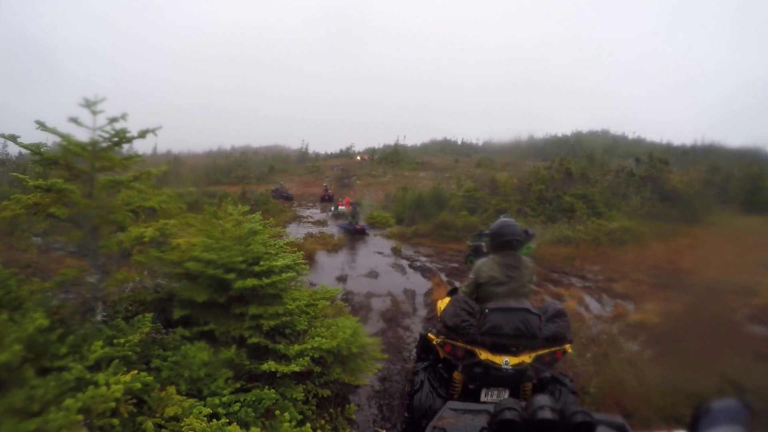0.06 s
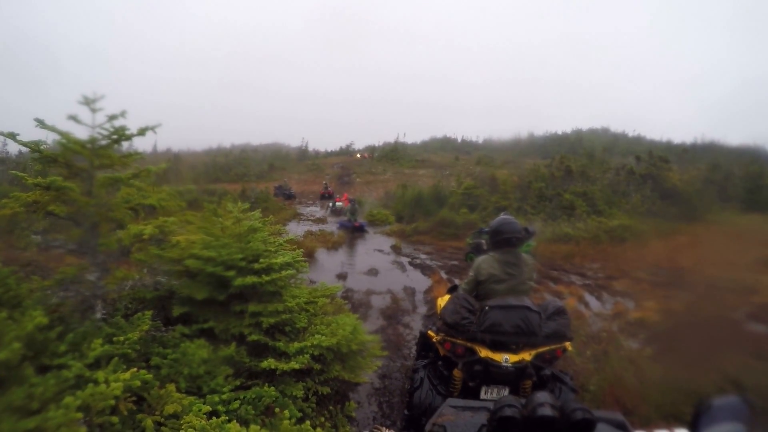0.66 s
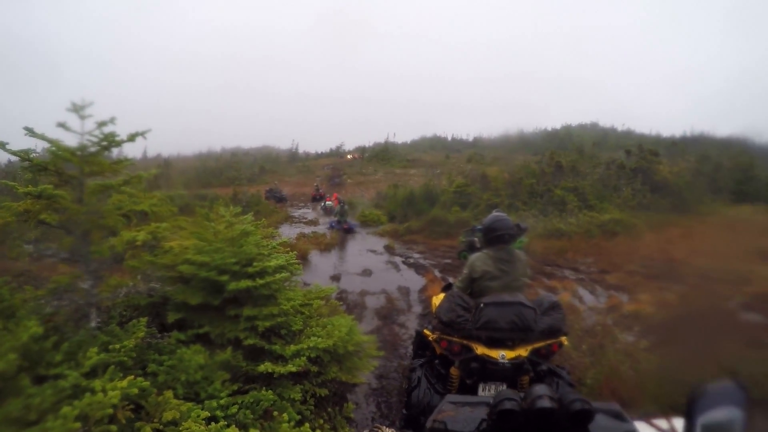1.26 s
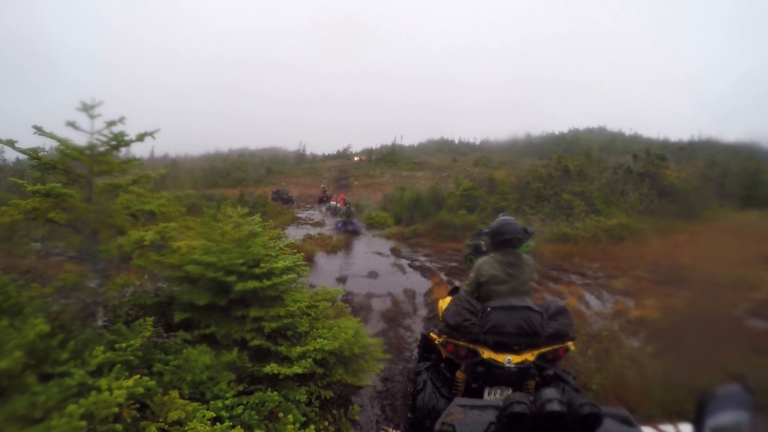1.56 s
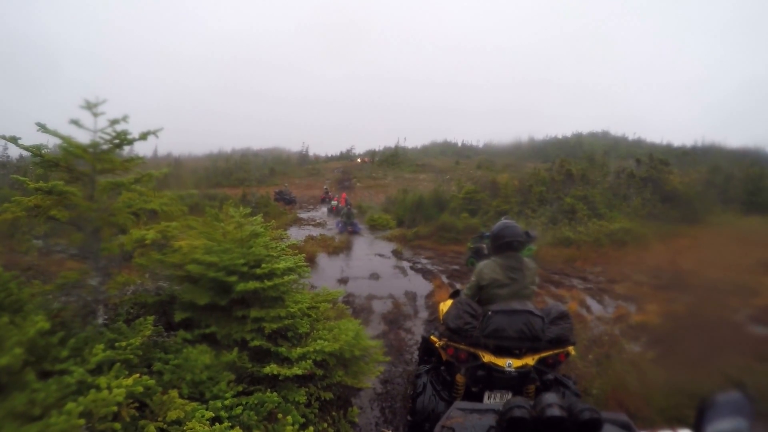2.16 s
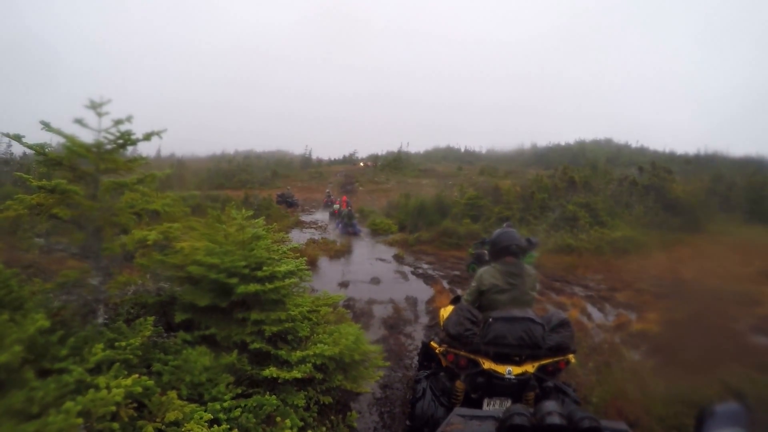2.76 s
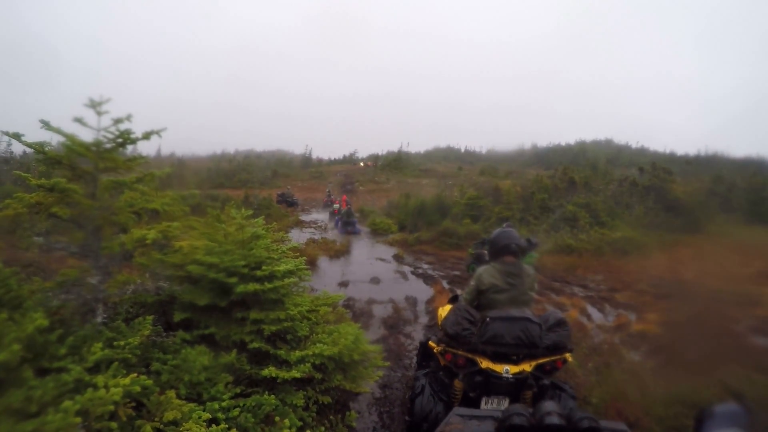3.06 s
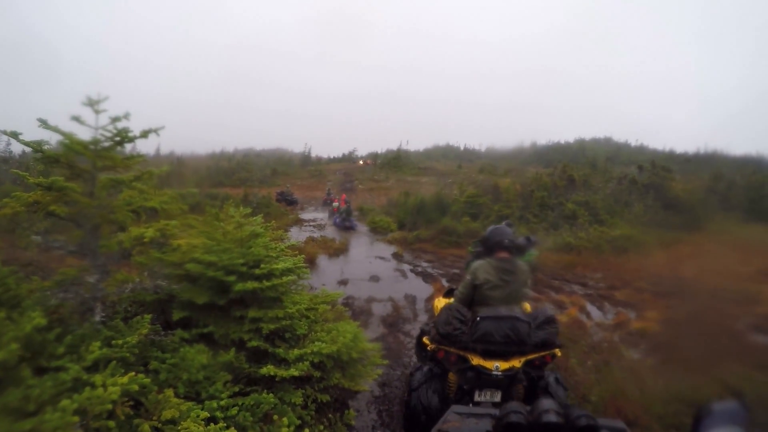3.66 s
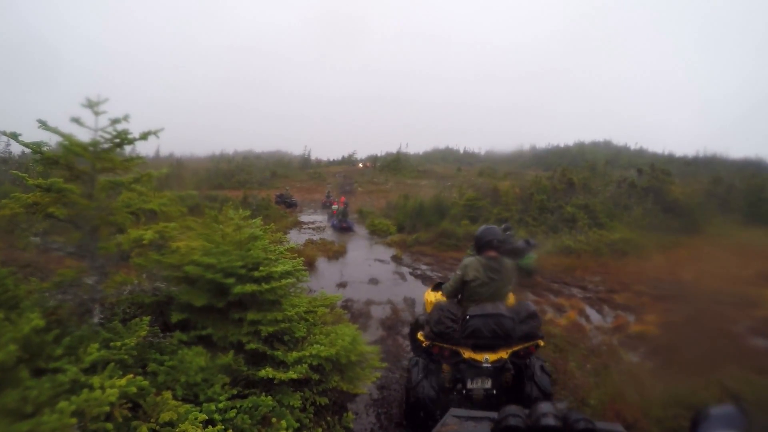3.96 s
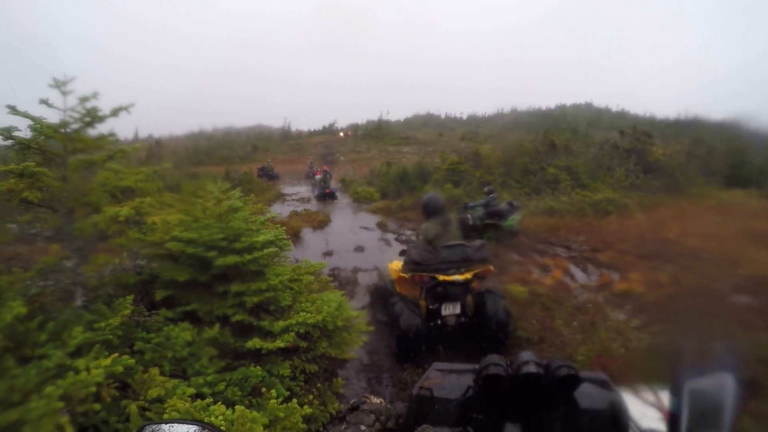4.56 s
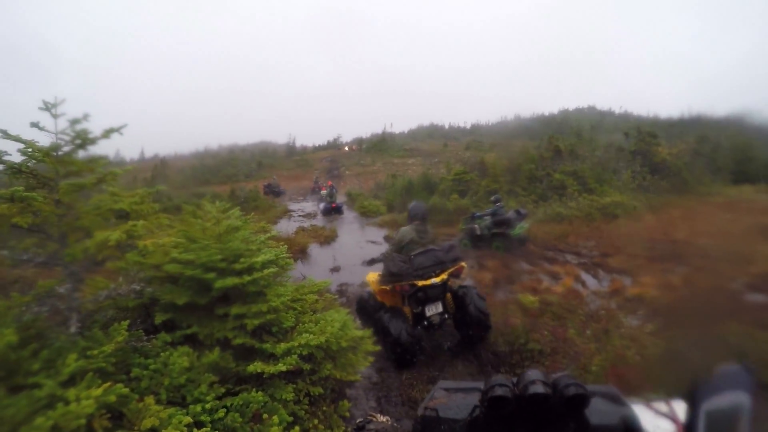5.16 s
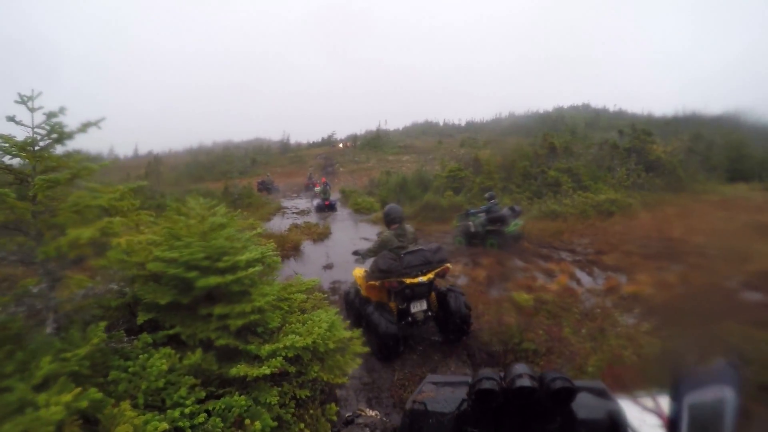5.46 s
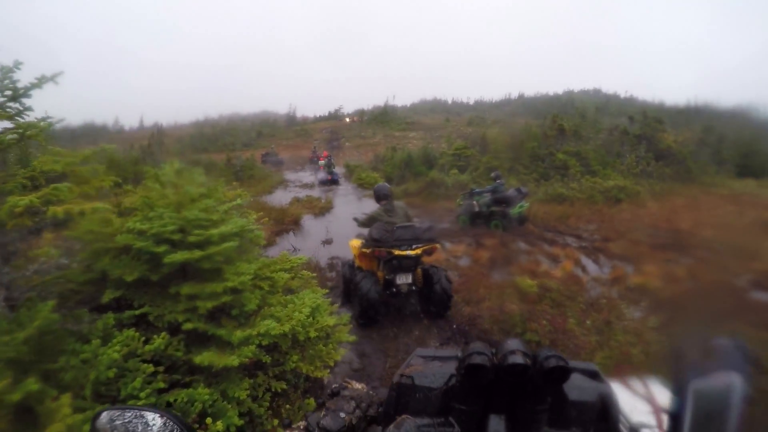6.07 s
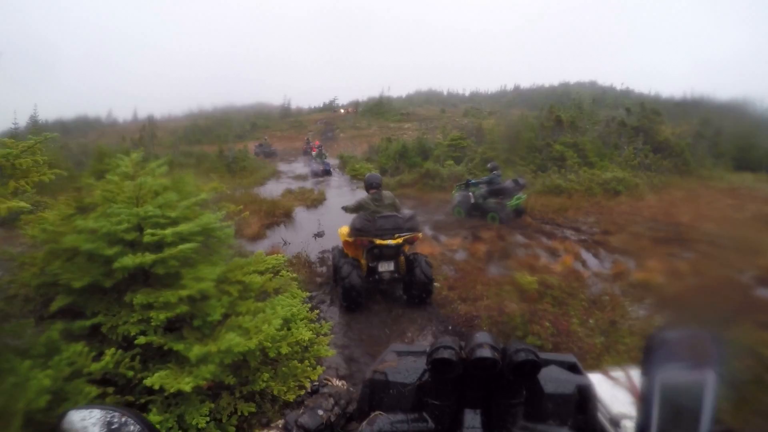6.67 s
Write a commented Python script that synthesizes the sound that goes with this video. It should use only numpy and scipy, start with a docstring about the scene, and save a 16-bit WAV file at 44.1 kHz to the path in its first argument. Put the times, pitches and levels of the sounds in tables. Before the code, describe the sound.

On open, wet ground, a heavy low rumble comes from a quad bike idling right under the microphone, its valves rattling softly. Drizzle hits the microphone's case in sharp, irregular ticks that thin out after about three seconds. Meanwhile another quad just ahead rises from idle in a few swells, flings a brief, faint splash, and labours slowly off through the mud while the near engine keeps throbbing.

```python
"""All-terrain vehicles in a bog

A V-twin idles, heard from the rider's seat: uneven firing pulses boom in the silencer while
valve impacts ring the metal. A second one just ahead idles, then revs and crawls away through
the mud, throwing one spray of water. Drizzle taps the microphone's housing and excites its
modes; a faint hiss flutters behind the engines, over the wash of the moor."""
import sys
import numpy as np
from scipy import signal
from scipy.fft import rfft, irfft
from scipy.io import wavfile
from scipy.ndimage import uniform_filter1d

SR = 44100
rng = np.random.default_rng(int(sys.argv[2]) if len(sys.argv) > 2 else 0)


def master(y):
    """Save y as 16-bit WAV."""
    cut = np.clip(np.atleast_2d(y).T, -1, 1)
    pcm = np.round(cut * 32767)  # scale
    wavfile.write(sys.argv[1], SR, pcm.astype(np.int16))


N = 301203
TIME = np.arange(N) / SR

# spectrum of the hiss and the spray: f/Hz, level/dB
HISS_SPECTRUM = [(1500, -16), (3200, -0.5), (4200, 0), (4900, -1), (5500, -3.5), (6200, -8), (6900, -3.5),
                 (7700, -12), (8600, -10), (11000, -25.5), (12800, -8.5), (14500, -29)]


def undb(db):
    """Amplitude ratio of a level in decibels."""
    return 10 ** (np.asarray(db) / 20)


def level(x, db):
    """Scaling to an rms level."""
    return x * undb(db) / np.sqrt(np.mean(x ** 2))


def curve(table):
    """Linear interpolation of (time, value) rows at every sample."""
    return np.interp(TIME, *np.transpose(table))


def noise():
    """Gaussian white noise."""
    return rng.standard_normal(N)


def walk(rate):
    """Random modulation of unit rms: steps of 1 / rate seconds, smoothed twice."""
    hold = int(SR / rate)
    steps = np.repeat(rng.standard_normal(N // hold + 1), hold)
    return level(uniform_filter1d(uniform_filter1d(steps, hold), hold)[:N], 0)


def colour(x, points, size=16384):
    """Minimum-phase filter through (f/Hz, level/dB) points, by folding the cepstrum."""
    hz, db = np.transpose(points)
    bins_hz = np.arange(size // 2 + 1) * SR / size
    gain = undb(np.interp(np.log(bins_hz + 1), np.log(hz), db))
    cepstrum = irfft(np.log(gain))
    cepstrum[1:size // 2] *= 2
    cepstrum[size // 2 + 1:] = 0
    return signal.fftconvolve(x, irfft(np.exp(rfft(cepstrum))))[:len(x)]


def lowpass(x, hz):
    """Second-order Butterworth roll-off above hz."""
    return signal.sosfilt(signal.butter(2, hz, fs=SR, output="sos"), x)


def highpass(x, hz, order=4):
    """Butterworth roll-off below hz."""
    return signal.sosfilt(signal.butter(order, hz, "highpass", fs=SR, output="sos"), x)


def resonate(x, modes):
    """Forced response of parallel resonators (f/Hz, bandwidth/Hz, level/dB)."""
    return sum(undb(db) * signal.lfilter(*signal.iirpeak(hz, hz / width, fs=SR), x)
               for hz, width, db in modes)


def ring(hz, t60):
    """Free vibration of one damped mode."""
    t = TIME[:SR // 25]
    return np.sin(2 * np.pi * hz * t) * np.exp(-np.log(1000) * t / t60)


def add(out, s, sound):
    """Superposition of a short sound at time s."""
    i = int(np.clip(s * SR, 0, N - 1))
    out[i:i + len(sound)] += sound[:N - i]


def bell(t, centre, half_width):
    """Gaussian envelope, down to 1/e at half_width from its centre."""
    return np.exp(-((t - centre) / half_width) ** 2)


def lulls():
    """Amplitude modulation: the low throb sags briefly."""
    # dips: t/s, level/dB, half-width/s
    dips = [(0.236, -9, .015), (0.885, -13, 0.05), (2.7, -10, 0.015), (4.85, -5.5, 0.015),
            (5.517, -6, 0.02)]
    return undb(sum(db * bell(TIME, s, half) for s, db, half in dips))


def moor():
    """Filtered noise: a gently wavering wash of open ground over a low rumble."""
    # the shaking machine and the air: f/Hz, level/dB
    rumble_spectrum = [(8, -29), (20, -32.5), (32, -5), (45, -14.5), (65, -2), (90, -6.5), (125, -14),
                       (170, -26), (300, -45.5), (600, -73.5)]
    # wet moor and far engines: f/Hz, level/dB
    wash_spectrum = [(260, -46.5), (450, -8), (529, -11), (846, -9.5), (1170, -7.5), (1370, -13.5),
                     (1810, -13), (1980, -32), (2330, -5), (2540, -15), (3030, -16.5), (4120, -27),
                     (11000, -31), (12800, -33.5), (15000, -89.5)]
    rumble = level(lowpass(colour(noise(), rumble_spectrum), 310), db=-19) * lulls()
    wash = level(colour(noise(), wash_spectrum) * undb(0.3 * walk(rate=4.3)), db=-55.5)
    return wash + rumble


def hiss(puff_half_s=0.0078, scatter_db=2, edge_db=0.5, floor_db=-61.5):
    """Amplitude-modulated noise: bouts of quick, even puffs add in power to a steady metallic hiss."""
    # bouts of flutter: onset t/s, duration/s, puff rate/Hz, level/dB
    bouts = [(.05, .45, 21, -52.5), (0.532, 0.96, 30.5, -55), (1.568, 1.46, 23.3, -52.5),
             (3.456, 0.052, 20, -41), (3.562, 0.31, 19.5, -54), (3.837, .075, 20, -46),
             (4.115, 0.13, 21.7, -47), (4.369, .17, 20.6, -50.5), (4.899, 1, 22, -54.5),
             (5.955, .1, 16, -52.5), (6.082, 0.14, 21.6, -48.5), (6.605, 0.06, 21.3, -46)]
    # thin metallic resonances: f/Hz, bandwidth/Hz, level/dB
    zing_modes = [(3250, 360, -2), (5570, 210, -4), (6700, 210, -13)]
    flutter = np.zeros(N)
    puff = bell(TIME[:SR // 10], .05, puff_half_s)
    for start, length, rate, db in bouts:
        for after, chance in zip(np.arange(0, length, 1 / rate), rng.standard_normal(64)):
            lift_db = edge_db * (1 - np.sin(np.pi * after / length))
            add(flutter, start + after - len(puff) / 2 / SR, puff * undb(db + lift_db + scatter_db * chance))
    air = level(colour(noise(), HISS_SPECTRUM), 0)
    zing = level(resonate(air, zing_modes), db=-1)
    return level(air + zing, 0) * np.hypot(flutter, undb(floor_db))


def spray(at_s=4.43, half_s=0.067, grain_db=3.9):
    """A noise burst, grainy from fast modulation: the tyres ahead fling water as they pull free."""
    droplets = noise() * undb(grain_db * walk(rate=600))
    return level(colour(droplets, HISS_SPECTRUM), db=-50.5) * bell(TIME, at_s, half_s)


def drop(peak_db, hz, treble_db, splat_s=0.0006, splat_lift_db=4, off_pitch_db=4):
    """Impact excitation: a drop splats and rings the housing; where it lands favours one pitch."""
    # modes of the housing: f/Hz, T60/s, level/dB
    housing_modes = [(2020, 0.0057, -16.5), (2350, 0.0072, 8), (2690, 0.011, 4), (3240, 0.019, -3),
                     (3470, 0.036, -25.5), (5640, 0.025, -27.5), (7500, 0.022, -29)]
    # splat of a drop: f/Hz, level/dB
    splat_spectrum = [(1000, -19.5), (2500, 9.5), (5500, 6.5), (8000, -1), (10500, -5.5), (12500, -6),
                      (14000, -9), (16000, -50.5)]
    modes = [(f, t60, db - off_pitch_db * min(2 * abs(np.log2(f / hz)), 1))
             for f, t60, db in housing_modes]
    modes.append((hz, .014, 4))  # the favoured pitch
    body = sum(undb(db + rng.standard_normal()) * ring(f, t60) for f, t60, db in modes)
    body = highpass(body, 1494, order=6)
    body *= undb(peak_db) / np.abs(body).max()
    burst = rng.standard_normal(len(body)) * np.exp(-TIME[:len(body)] / splat_s)
    splat = highpass(colour(burst, splat_spectrum, size=512), 3700)
    return body + body.std() * level(splat, treble_db + splat_lift_db)


def rain(fine_count=32, fine_db=-36, spread_db=5.5, thinning_s=3.1):
    """Superposed impacts: fat drops among fine random ones whose rate decays exponentially."""
    # fat drops: t/s, peak ring level/dB, favoured f/Hz, relative treble level/dB
    fat_drops = [(0.0979, -26.5, 1620, -26), (0.0984, -15, 2020, -33), (0.2907, -25.5, 2050, -28),
                 (0.5627, -8.5, 3370, -6), (0.638, -20.5, 2840, -15), (0.6913, -28, 1900, -13),
                 (0.7276, -17, 1960, -29), (0.7945, -23.5, 1780, -12), (0.8121, -15.5, 2680, -12),
                 (0.848, -24.5, 1830, -36), (1.0095, -28, 1760, -25), (1.045, -18, 2040, -35),
                 (1.078, -23, 1880, -15), (1.1165, -22.5, 1890, -16), (1.2938, -29, 3520, -8.5),
                 (1.4192, -27.5, 1920, -10), (1.4364, -28, 2200, -22), (1.4534, -16.5, 1980, -43),
                 (1.5185, -28, 1800, -15), (1.6536, -4.5, 3010, -15), (1.6572, -15, 2170, -21),
                 (1.9397, -30, 1800, -27), (1.9481, -13.5, 2800, -41), (2.112, -16.5, 2040, -15),
                 (2.1719, -12.5, 2620, -48), (2.262, -25, 1770, -26), (2.2904, -26, 1800, -15),
                 (2.3144, -14.5, 2000, -18), (2.3284, -15, 2900, -14), (2.395, -20, 2760, -33),
                 (2.5855, -15, 1950, -8.5), (2.6291, -28, 1790, -10), (2.6593, -20, 1630, -8),
                 (2.833, -28.5, 1580, -16), (2.8545, -31, 1800, -6.5), (2.939, -22, 1870, -12.5),
                 (2.973, -23, 2230, -20), (2.9839, -18.5, 1980, -28), (3.0225, -22.5, 2040, -32),
                 (3.3893, -27, 1670, -11), (3.6176, -31, 1700, -13), (3.715, -27.5, 1930, -14),
                 (3.75, -24.5, 1840, -18), (3.928, -20, 2060, -14), (4.127, -23.5, 2410, -27),
                 (5.101, -24.5, 2730, -19), (5.3107, -19.5, 1640, -18), (6.1922, -30, 1780, -11),
                 (6.4754, -27, 1870, -30)]
    # heavy drops also knock the hollow of the housing: t/s, level/dB, f/Hz
    plops = [(.563, -41, 790), (2.658, -40, 620)]
    out = np.zeros(N)
    for s, db, hz, treble_db in fat_drops:
        add(out, s, drop(db, hz, treble_db))
    for s, db, hz in plops:
        add(out, s, undb(db) * (ring(hz, t60=0.039) + 3.5 * ring(1.22 * hz, t60=0.0087)))
    fallen = 1 - np.exp(-TIME / thinning_s)
    for when, size, spot in rng.random((fine_count, 3)):
        tap = drop(fine_db + spread_db * (2 * size - 1), hz=1800 + 1200 * spot, treble_db=-13)
        add(out, np.interp(when * fallen[-1], fallen, TIME), tap)
    return out


def moments(cycles, phase):
    """Times at which an engine passes one phase of its four-stroke cycle."""
    return np.interp(np.arange(phase % 1, cycles[-1], 1), cycles, TIME)


def firings(cycles, first_phase, scatter_db, jitter_s):
    """Uneven pulse train: two cylinders fire 280 and 440 crank degrees apart, never twice alike."""
    out = np.zeros(N)
    for phase in (first_phase, first_phase + 280 / 720):
        chance = rng.standard_normal((256, 2))
        for s, (size, late) in zip(moments(cycles, phase), chance):
            add(out, s + jitter_s * late, undb([scatter_db * size]))
    return out


def surge(cycle_hz, full_throttle_hz_per_s=7.8, full_load=0.38, response_s=.15):
    """Inertial load: acceleration takes throttle, which the exhaust follows with a first-order lag."""
    throttle = np.clip(np.gradient(cycle_hz) * SR / full_throttle_hz_per_s, 0, 1)
    lag = np.exp(-3 * TIME[:SR] / response_s)
    return full_load * signal.fftconvolve(throttle, lag / lag.sum())[:N]


def engine_ahead(thump_rise_db=9, song_rise_db=23.5, rasp_rise_db=10):
    """Source and filter: thumps and gas rasp swell with load; in deep mud crank harmonics sing in the pipe."""
    # engine speed: t/s, four-stroke cycle rate/Hz
    revs = [(0.0, 10.5), (1.7, 10.4), (1.95, 14.6), (2.15, 17.4), (2.4, 14.5), (2.6, 19.4), (2.95, 17.9),
            (3.25, 17.6), (3.5, 22.1), (3.75, 23.1), (4.0, 17.0), (4.33, 12.4), (4.55, 13.1), (5.0, 12.0),
            (5.5, 13.05), (5.75, 14.5), (6.05, 14.4), (6.4, 12.4)]
    # drag of the mud on the wheels: t/s, load (0-1)
    mud = [(0, 0.28), (2.7, 0.01), (3.1, 0.35), (3.9, 0), (4.55, 0.56), (5.3, 0.23), (5.72, 0.8),
           (6.1, 0.81), (6.83, 0.5)]
    # path as it crawls off: t/s, distance/m
    path = [(0, 2.59), (3.8, 2.81), (6.83, 5.34)]
    # exhaust response: f/Hz, level/dB
    exhaust_spectrum = [(8, -53.5), (14, -18), (22, -14.5), (40, -11.5), (54, 6), (66, 0), (84, 14.5),
                        (100, -9), (125, 2.5), (160, -13.5), (200, -27), (300, -31), (600, -73.5)]
    # tailpipe resonances: f/Hz, bandwidth/Hz, level/dB
    pipe_modes = [(142.4, 10.6, 8.5), (170.6, 21, 2.5), (256, 36, -14), (320.5, 32, -9), (344.6, 13, -7),
                  (372.5, 16, -15)]
    # rough gas flow: f/Hz, level/dB
    rasp_spectrum = [(90, -36), (145, -3.5), (180, 4.5), (205, -0.5), (250, 3), (300, -5), (345, -9.5),
                     (420, -12), (520, -35.5), (900, -27.5), (2000, -79)]
    cycle_hz, drag, metres = curve(revs), curve(mud), curve(path)
    load = drag + surge(cycle_hz)
    cycles = np.cumsum(cycle_hz) / SR
    pulses = firings(cycles, first_phase=.76, scatter_db=1.0, jitter_s=.0001) / np.sqrt(cycle_hz)
    thump = level(lowpass(colour(pulses, exhaust_spectrum), 600), db=-24) * lulls()
    crank = np.diff(np.floor(2 * cycles), prepend=0)  # one impulse per revolution
    # each resonance acts twice, so the valleys between them stay dark
    song = sum(resonate(resonate(crank, [(hz, width, db)]), [(hz, width, 0)])
               for hz, width, db in pipe_modes)
    song = level(song, db=-53.5)
    gas = noise() * signal.fftconvolve(pulses, np.exp(-TIME[:SR // 10] / 0.071))[:N]
    rasp = level(lowpass(colour(gas, rasp_spectrum), 870), db=-45.5)
    exhaust = (thump * undb(thump_rise_db * load)
               + song * undb(song_rise_db * drag)
               + rasp * undb(rasp_rise_db * load))
    return exhaust * metres[0] / metres  # spherical spreading


def clatter(cycles, case_db=-46, head_db=-51.5, scatter_db=3.0, ring_db=-5):
    """Impact excitation: valves and cam chain ring the case and head, each knock at its own pitch."""
    # valve train knocks: phase/cycle, level/dB, decay time/s, head brightness/dB, ring f/Hz
    knocks = [(.075, -1, 0.014, -15.5, 1655), (0.388, 0.5, 0.016, 4.5, 1777), (.465, 1.5, 0.009, 6, 1127),
              (.54, 2.5, 0.0029, -13, 1875), (.62, -1.5, 0.026, 2, 1919), (.79, 8.5, 0.017, -2, 1620),
              (.875, 4.5, 0.023, 4, 1184)]
    # crankcase resonances: f/Hz, bandwidth/Hz, level/dB
    case_modes = [(1082, 35, 6), (1310, 37, 2.5), (1810, 36, 9.5), (1602, 46, 9), (1807, 55, 11),
                  (1935, 230, 8)]
    # cylinder head resonances: f/Hz, bandwidth/Hz, level/dB
    head_modes = [(1190, 240, -36.5), (2077, 320, 14), (2930, 190, 11), (3045, 170, 7.5), (3430, 70, 1.5)]
    case, head = np.zeros(N), np.zeros(N)
    t = TIME[:SR // 20]
    for phase, db, decay_s, bright_db, hz in knocks:
        pattern = rng.standard_normal(len(t))  # the part that repeats every cycle
        for s in moments(cycles, phase):
            rattle = (pattern + rng.standard_normal(len(t))) * np.exp(-t / decay_s)
            blow_db = db + scatter_db * (2 * rng.random() - 1)
            add(case, s, level(resonate(rattle, case_modes), blow_db))
            add(case, s, level(ring(hz, t60=0.067), blow_db + ring_db))
            add(head, s, level(resonate(rattle, head_modes), blow_db + bright_db))
    shell = signal.butter(3, [930, 3700], "bandpass", fs=SR, output="sos")
    case = level(lowpass(signal.sosfilt(shell, case), 1800), case_db)
    head = level(signal.sosfilt(shell, head), head_db)
    return case + head


def near_engine():
    """Forced resonance: the firings of a loping idle boom in the silencer under the valve clatter."""
    # idle speed: t/s, four-stroke cycle rate/Hz
    idle = [(0.0, 10.51), (1.2, 10.546), (2.2, 10.34), (3.0, 10.457), (3.8, 10.329), (4.6, 10.412),
            (5.4, 10.499), (6.83, 10.45)]
    # silencer response: f/Hz, level/dB
    silencer_spectrum = [(15, -26.5), (30, -26), (42, -8.5), (52, 10), (62, 1.5), (73, 0.5), (84, 5.5),
                         (100, -3.5), (115, -10), (140, -32), (190, -32), (250, -38.5), (350, -37.5),
                         (500, -54.5)]
    cycles = np.cumsum(curve(idle)) / SR
    pulses = firings(cycles, first_phase=.68, scatter_db=.7, jitter_s=.00025)
    boom = level(lowpass(colour(pulses, silencer_spectrum), 480), db=-18) * lulls()
    return boom + clatter(cycles)


def scene():
    """Superposition of all sources in one channel."""
    return (near_engine() + engine_ahead() + hiss() + spray() + rain() + moor())[None]


def record(dry, top_hz=14700):
    """Soft saturation rounds the highest peaks; an elliptic low-pass cuts the top."""
    rounded = dry / (1 + dry ** 8) ** (1 / 8)
    return signal.sosfilt(signal.ellip(8, .2, 70, top_hz, fs=SR, output="sos"), rounded)


dry = scene()
out = record(dry)
master(out)
```